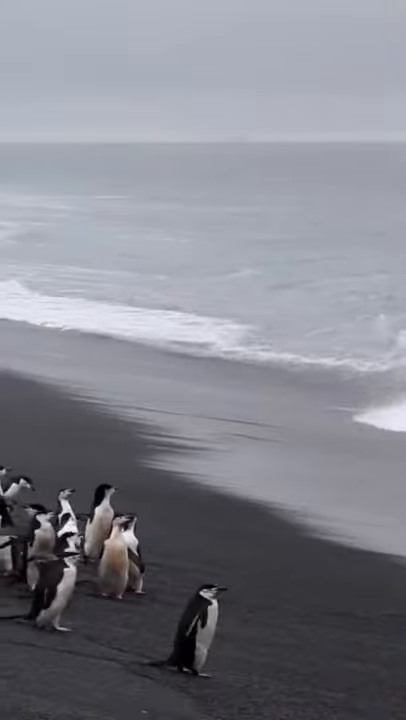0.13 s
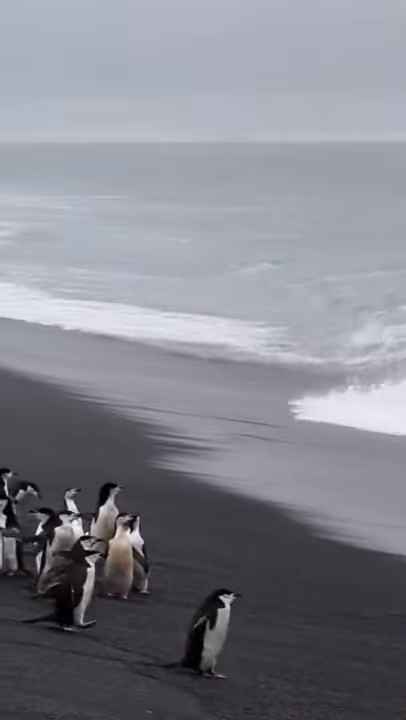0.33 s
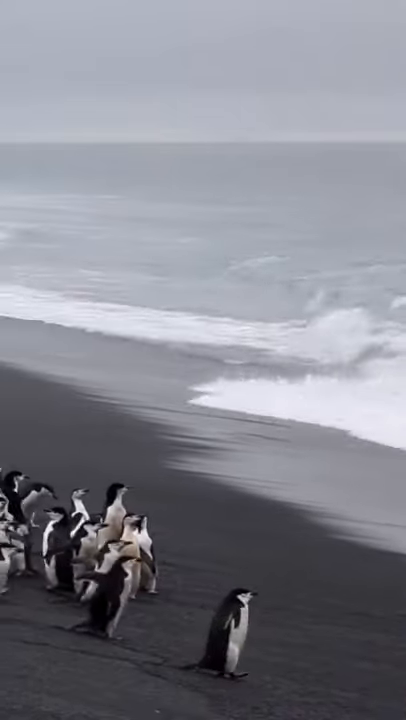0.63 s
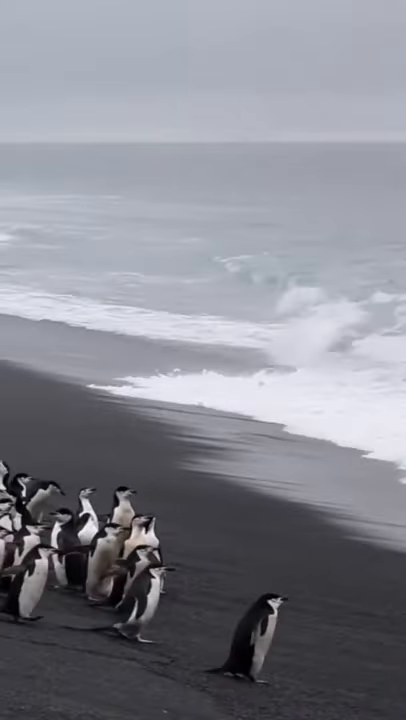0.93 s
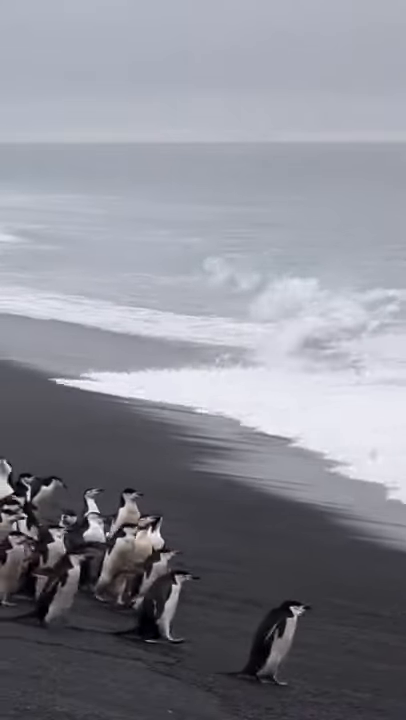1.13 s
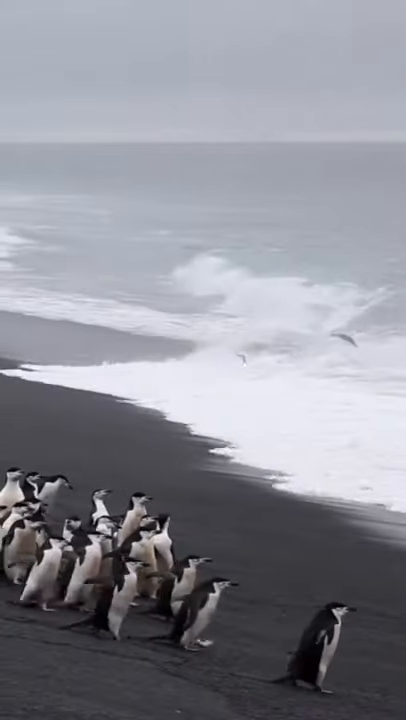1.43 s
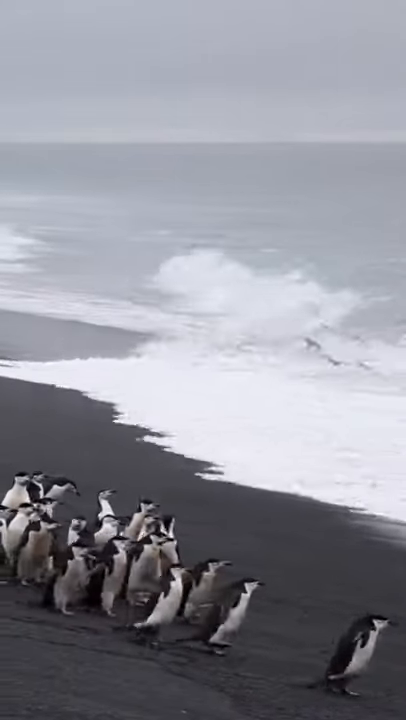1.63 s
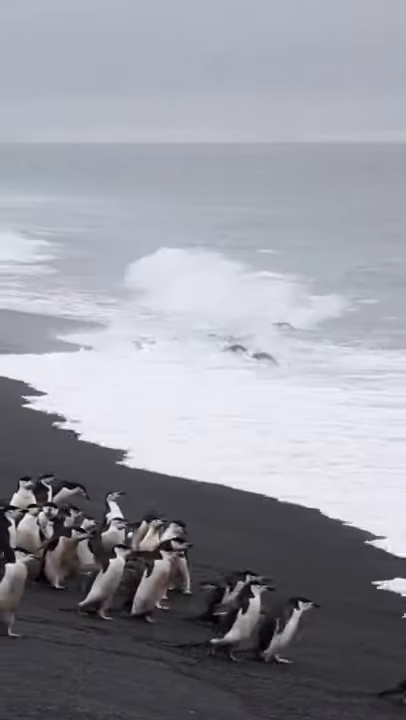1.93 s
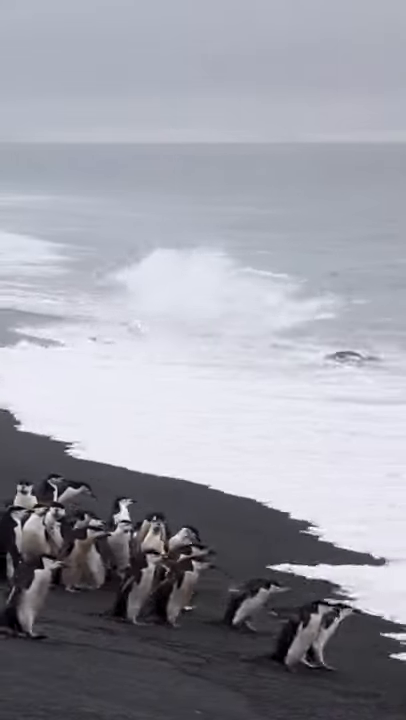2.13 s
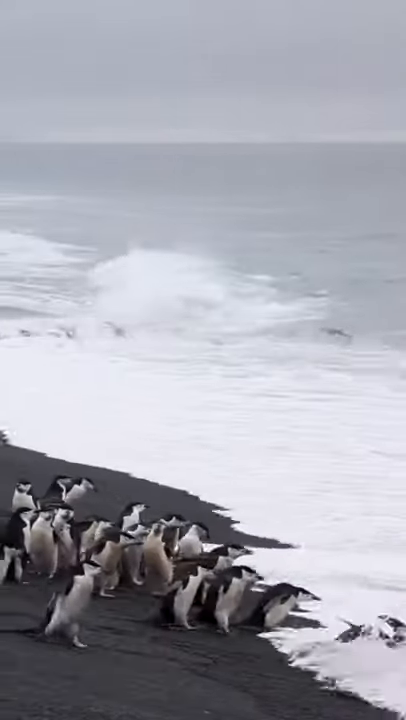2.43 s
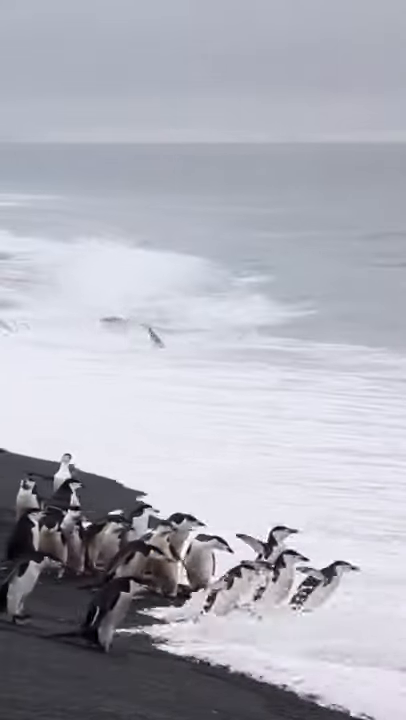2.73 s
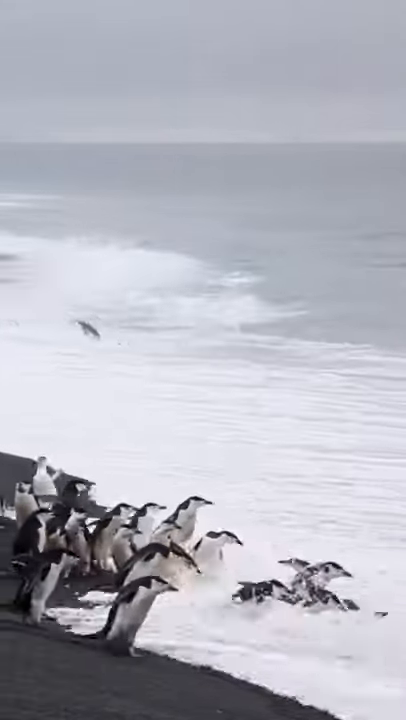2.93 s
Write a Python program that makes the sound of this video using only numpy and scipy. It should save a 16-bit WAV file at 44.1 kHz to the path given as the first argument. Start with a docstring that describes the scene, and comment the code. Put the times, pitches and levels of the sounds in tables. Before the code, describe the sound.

Surf runs up a dark gravelly beach, hissing and fizzing continuously; a breaker roars behind it and wind thuds hard on a phone microphone. A few faint bird peeps and rasps sound early on.

```python
"""Surf running up a gravel beach in gusty wind, taken on a phone microphone: the wash hisses and fizzes.
Behind it the breaker roars, with slaps and spray; both are noise shaped by level and spectrum curves.
Wind rumbles on the microphone and strong eddies bump it one by one, each a short swing of pressure.
Seabirds sit faintly in the roar: peeps are gliding sines, rasps are bursts of throaty noise.
All is central except the treble of the foam, which spreads to the sides."""
import sys
import numpy as np
from scipy import signal
from scipy.fft import rfft, irfft, next_fast_len
from scipy.io import wavfile
from scipy.ndimage import uniform_filter1d, map_coordinates

SR = 44100
rng = np.random.default_rng(int(sys.argv[2]) if len(sys.argv) > 2 else 0)


def volts_from_decibels(level):
    """Turn decibel levels (scalar or array-like) into linear amplitude factors."""
    exponent = np.asarray(level, float) / 20
    return 10 ** exponent


def to_wav(s):
    """Save 16-bit WAV."""
    ch = np.atleast_2d(s).T  # columns
    pcm = np.round(np.clip(ch, -1, 1) * 32767)  # PCM
    wavfile.write(sys.argv[1], SR, pcm.astype(np.int16))


N = 136269  # samples

# Foam running over the gravel: t/s, hiss level/dB, treble level/dB (only its departure from the mean counts)
WASH_LEVELS = [(0.15, -26.5, -11.5), (0.33, -26.5, -16), (0.35, -25.5, -15.5), (0.44, -27, -9),
               (0.51, -30.5, -11.5), (0.57, -27.5, -15), (0.59, -28.5, -17), (0.63, -23.5, -18),
               (0.74, -27.5, -11), (0.8, -23, -20.5), (0.84, -25.5, -12), (0.87, -21, -24),
               (0.88, -23, -16), (1.09, -27.5, -11.5), (1.34, -24, -12), (1.55, -24, -11), (1.7, -27, -8.5),
               (1.75, -23, -15), (1.81, -28.5, -6.5), (2.15, -24.5, -11), (2.32, -25, -7.5),
               (2.44, -26, -8.5), (2.58, -27.5, -5.5), (2.86, -29, -9.5), (2.88, -25.5, -10.5),
               (2.99, -31.5, -9), (3.07, -29.5, -6.5), (3.08, -29.5, -10.5)]
# Roar of the wave behind the wash: t/s, level/dB
BREAKER_LEVELS = [(.13, -36.5), (.45, -44.5), (.6, -34.5), (.75, -26), (.88, -24.5), (1.0, -28.5),
                  (1.15, -31.5), (1.4, -28.5), (1.55, -28), (1.76, -26), (1.95, -25), (2.12, -28),
                  (2.26, -22.5), (2.35, -22.5), (2.45, -26), (2.56, -23.5), (2.7, -29.5), (2.87, -39.5),
                  (3.08, -35)]
# Wind rumble at the microphone: t/s, level/dB
GUST_LEVELS = [(.13, -38), (.22, -28.5), (.3, -30), (.38, -28.5), (.43, -33.5), (.49, -24), (.56, -30.5),
               (.595, -35), (.9, -33), (1.0, -26), (1.1, -32), (1.22, -34.5), (1.29, -31.5), (1.39, -29.5),
               (1.5, -33.5), (1.64, -27.5), (1.8, -31), (1.97, -35), (2.03, -24.5), (2.2, -29),
               (2.5, -27.5), (2.7, -31), (2.8, -29), (2.9, -36.5), (2.96, -29.5), (3.03, -41), (3.08, -32)]
# Spectrum of the foam's hiss: f/Hz, density/dB
HISS_SPECTRUM = [(530, -50), (900, -5.5), (1480, -3.5), (1830, -1), (2090, -2.5), (3380, -3), (4040, -2),
                 (5040, -7.5), (5510, -4.5), (6650, -7.5), (10000, -30.5), (12800, -37.5), (16700, -67),
                 (22000, -120)]
# Spectrum of the breaker: f/Hz, density/dB
ROAR_SPECTRUM = [(60, -58), (200, -16), (400, 0.5), (800, -3), (1300, -9), (2500, -15.5), (6000, -66)]
# Spectrum of the wind rumble: f/Hz, density/dB
RUMBLE_SPECTRUM = [(10, -64), (30, -28), (60, -20), (100, -6.5), (200, 1), (400, -9), (900, -15),
                   (3000, -80)]
# Width of the foam: f/Hz, side over mid/dB
FOAM_WIDTH = [(3950, -95), (4150, -15.5), (4900, -2.5), (8000, -2.5), (13000, -4)]
# Strong eddies bumping the microphone: t/s, peak level/dB, pitch f/Hz, width/cycles
STRONG_EDDIES = [(0.168, -19, 162, 1.7), (0.236, -10.5, 216, 0.92), (0.261, -17, 170, 0.79),
                 (0.28, -21, 180, 0.92), (0.293, -16, 170, 0.72), (0.324, -19, 160, 0.93),
                 (0.344, -15, 192, 0.65), (0.373, -18.5, 190, 0.73), (0.471, -5, 378, 1.8),
                 (0.48, -4, 213, 0.26), (0.489, -14, 260, 0.31), (0.504, -4.5, 162, 0.32),
                 (0.555, -10.5, 170, 1.6), (0.79, -14, 544, 2.1), (0.976, -7, 177, 0.93),
                 (1.001, -17, 270, 1.2), (1.007, -11.5, 453, 2), (1.015, -13, 218, 1.7),
                 (1.027, -8, 497, 3.7), (1.034, -2.5, 228, 0.93), (1.54, -11.5, 161, 1.2),
                 (1.631, -7.5, 234, 1.3), (1.641, -8, 266, 1.3), (1.646, -4.5, 388, 0.8),
                 (1.7, -20, 253, 2.4), (1.752, -8.5, 880, 2.8), (2.025, -15, 145, 1.3),
                 (2.043, -13, 162, 0.52), (2.091, -19, 272, 0.45), (2.265, -13.5, 393, 1.5),
                 (2.281, -12, 398, 1.2), (2.381, -18.5, 285, 2.2), (2.47, -12.5, 240, 1),
                 (2.514, -7.5, 414, 1.54), (2.53, -22, 303, 0.98), (2.537, -13, 320, 0.79),
                 (2.622, -15, 338, 1.1), (2.655, -12, 238, 0.69), (2.745, -16.5, 270, 0.97),
                 (2.797, -16, 137, 1.3), (3.081, -6.5, 170, 0.79)]
# Bird peeps: start t/s, length/s, first f/Hz, last f/Hz, level/dB
BIRD_PEEPS = [(.25, .045, 2050, 2230, -33), (.352, .114, 2750, 1965, -27.5),
              (.298, .058, 3880, 3760, -29.5), (.332, .03, 1790, 1750, -28), (.346, .054, 5450, 5350, -30),
              (.35, .03, 4750, 4650, -33), (.4, .035, 4550, 4400, -33), (.532, .045, 5150, 4950, -34),
              (.662, .048, 2400, 1900, -30.5), (.625, .025, 3650, 3550, -29),
              (.645, .03, 5300, 5250, -34.5), (2.9, .028, 5350, 5100, -29.5)]
# Bird rasps: start t/s, length/s, level/dB
BIRD_RASPS = [(0.339, 0.071, -24.5), (0.401, 0.063, -28), (0.531, 0.054, -25.5), (.61, 0.064, -36),
              (2.885, 0.029, -39)]
# Spectrum of the rasping throat: f/Hz, density/dB
THROAT_SPECTRUM = [(1200, -36), (2200, 8), (3500, 7), (5200, 8), (6800, -6), (9500, -37), (13000, -63)]
# Slaps and spray of the wave: centre t/s, half length/s, centre f/Hz, peak level/dB
SPLASH_SWELLS = [(2.34, 0.033, 960, -22.5), (2.55, 0.053, 830, -30.5), (2.42, 0.28, 4200, -32),
                 (2.3, 0.034, 4600, -29), (2.25, 0.43, 11500, -54)]

FOAM_TREBLE_HZ = 4880  # treble above this swells as the foam comes near
FIZZ_DB, FIZZ_HZ, FIZZ_CYCLES = -12, 3650, 1.8  # level against the hiss, middle pitch, width
EDDY_DB, EDDY_HZ, EDDY_CYCLES = -3.5, 170, 0.94  # small eddies: level against the rumble, middle pitch, width
HEAVE_DB, HEAVE_RATIO = -9.5, 0.47  # slow heave: level and pitch against its strong eddy
FLUTTER_DB, FLUTTER_RATIO = -11, 1.85  # quick flutter: level and pitch against its strong eddy
GLIDE_S, PEEP_WAVER = .028, .008  # time constant of the glide; waver as a share of pitch
HOARSE_DB = 3.5  # level waver of a peep with no glide; scaled by last over first pitch
EDGE_S = .008  # fade at each end of a bird call
SPLASH_OCTAVES = 0.5  # spacing of the points that shape a splash band
LOW_CUT_HZ = 45
CLIP_LEVEL, CLIP_HARDNESS = .85, 4  # amplitude ceiling; exponent of the bend towards it
START_S = .129  # the microphone opens


def unit(x):
    """Scales to rms 1."""
    return x / np.sqrt(np.mean(x ** 2) + 1e-20)


def curves(rows):
    """Draws one value per sample for each column after the time."""
    s, *columns = np.transpose(rows)
    return [np.interp(np.arange(N) / SR, s, column) for column in columns]


def wobble(rate):
    """A smooth random curve, rate knots a second."""
    return map_coordinates(rng.standard_normal(1600), [np.arange(N) * rate / SR], mode="wrap")


def coloured(x, points):
    """Passes x through a spectrum of (Hz, dB) points, joined along log frequency."""
    size = next_fast_len(N + 8192)
    hz, db = np.transpose(points)
    log_hz = np.log(np.fft.rfftfreq(size, 1 / SR) + 1)
    gain = volts_from_decibels(np.interp(log_hz, np.log(hz + 1), db, -120, -120))
    return irfft(rfft(x, size) * gain, size)[..., :N]


def patchy(depth_db, channels):
    """White noise with patches of random gain in time and frequency, shared by its channels."""
    z = signal.stft(rng.standard_normal((channels, N)), nperseg=512)[2]
    field = uniform_filter1d(rng.standard_normal(z.shape[1:]), 6, axis=0)
    field = uniform_filter1d(field, 8, axis=1)
    return signal.istft(z * volts_from_decibels(depth_db * unit(field)), nperseg=512)[1][:, :N]


def wavelets(s, gain, hz, cycles, size):
    """Short swings of pressure centred on times s, each a few cycles under a bell."""
    k = np.arange(-size, size)
    turns = k / SR * np.asarray(hz)[:, None]
    phase = 2 * np.pi * rng.random((len(s), 1))
    bell = np.exp(-(2 * turns / cycles) ** 2)
    wave = np.asarray(gain)[:, None] * bell * np.cos(2 * np.pi * turns + phase)
    at = np.clip((np.asarray(s)[:, None] * SR).astype(int) + k, 0, N)
    return np.bincount(at.ravel(), wave.ravel(), N + 1)[:N]


def grains(hz, cycles, spread, size_db, count, size):
    """A random rain of wavelets, of scattered pitch and size."""
    s = rng.random(count) * N / SR
    gain = volts_from_decibels(size_db * np.minimum(rng.exponential(size=count), 2))
    pitch = hz * np.exp(spread * np.clip(rng.standard_normal(count), -2, 2))
    return unit(wavelets(s, gain, pitch, cycles, size))


def gate(s, length):
    """Opens at s and is shut again after length, with soft edges."""
    t = np.arange(N) / SR - s
    return np.clip(np.minimum(t, length - t) / EDGE_S, 0, 1)


def wash():
    """Hiss of foam with bursting bubbles; two unrelated streams, for centre and sides."""
    level_db, treble_db = curves(WASH_LEVELS)
    hiss = unit(coloured(patchy(depth_db=1.5, channels=2), HISS_SPECTRUM))
    fizz = [grains(FIZZ_HZ, FIZZ_CYCLES, spread=0.39, size_db=4.0, count=6000, size=48) for _ in range(2)]
    foam = hiss + volts_from_decibels(FIZZ_DB) * np.array(fizz)
    high_pass = signal.butter(4, FOAM_TREBLE_HZ, "high", fs=SR, output="sos")
    treble = signal.sosfiltfilt(high_pass, foam)
    level = volts_from_decibels(level_db + 1.0 * wobble(3.4) + 0.4 * wobble(9.83))
    treble_gain = volts_from_decibels(treble_db - treble_db.mean() + 0.79 * wobble(17))
    return level * (foam + (treble_gain - 1) * treble)


def breaker():
    """The dull tumbling roar of the wave: low noise of unsteady level."""
    level_db, = curves(BREAKER_LEVELS)
    roar = unit(coloured(patchy(depth_db=0.83, channels=1)[0], ROAR_SPECTRUM))
    return volts_from_decibels(level_db + 0.28 * wobble(8.8) + 0.98 * wobble(44.95)) * roar


def wind():
    """Lumpy rumble and a stream of small eddies, rising and falling with the gusts."""
    level_db, = curves(GUST_LEVELS)
    rumble = unit(volts_from_decibels(3.3 * wobble(24.88)) * coloured(rng.standard_normal(N), RUMBLE_SPECTRUM))
    eddies = grains(EDDY_HZ, EDDY_CYCLES, spread=0.57, size_db=0, count=400, size=900)
    return volts_from_decibels(level_db) * (rumble + volts_from_decibels(EDDY_DB) * eddies)


def strong_eddies():
    """Eddies bump the microphone; each rides on a slower heave of pressure and carries a quicker flutter."""
    s, db, hz, cycles = np.transpose(STRONG_EDDIES)
    bump = wavelets(s, volts_from_decibels(db), hz, cycles[:, None], size=900)
    heave = wavelets(s, volts_from_decibels(db + HEAVE_DB), HEAVE_RATIO * hz, 0.98, size=1500)
    flutter = wavelets(s, volts_from_decibels(db + FLUTTER_DB), FLUTTER_RATIO * hz, 0.8, size=300)
    return bump + heave + flutter


def peeps():
    """Seabird peeps: wavering, slightly hoarse tones that glide towards their last pitch."""
    t, out = np.arange(N) / SR, np.zeros(N)
    for s, length, first_hz, last_hz, db in BIRD_PEEPS:
        hz = last_hz + (first_hz - last_hz) * np.exp(-np.maximum(t - s, 0) / GLIDE_S)
        hz = hz * (1 + PEEP_WAVER * wobble(90))
        hoarse_db = HOARSE_DB * last_hz / first_hz
        level = volts_from_decibels(db + 0.5 * wobble(50) + hoarse_db * wobble(500))
        out += level * gate(s, length) * np.sin(2 * np.pi * np.cumsum(hz) / SR)
    return out


def rasps():
    """Seabird rasps: short bursts of noise coloured by the throat."""
    noise = unit(coloured(patchy(depth_db=2.5, channels=1)[0], THROAT_SPECTRUM))
    return noise * sum(volts_from_decibels(db) * gate(s, length) for s, length, db in BIRD_RASPS)


def splashes():
    """Parts of the wave slap down or throw spray: swells of noise round one pitch."""
    t, out = np.arange(N) / SR, np.zeros(N)
    for s, half, hz, db in SPLASH_SWELLS:
        band = [(hz * 2 ** (k * SPLASH_OCTAVES), -6 * k * k) for k in range(-3, 4)]
        swell = np.exp(-((t - s) / half) ** 2)
        out += volts_from_decibels(db) * swell * unit(coloured(rng.standard_normal(N), band))
    return out


def scene():
    """Puts everything in the centre and spreads the treble of the foam to left and right."""
    centre, sides = wash()
    mid = centre + breaker() + wind() + strong_eddies() + peeps() + rasps() + splashes()
    side = coloured(sides, FOAM_WIDTH)
    return np.array([mid + side, mid - side])


def low_pass(x):
    """Removes everything above the highest recorded frequency."""
    return signal.sosfilt(signal.butter(12, 12970, fs=SR, output="sos"), x)


def record(dry):
    """The phone microphone loses the deep bass, rounds off the highest peaks and opens abruptly."""
    low_cut = signal.butter(2, LOW_CUT_HZ, "high", fs=SR, output="sos")
    heard = signal.sosfilt(low_cut, dry)
    rounded = heard / (1 + np.abs(heard / CLIP_LEVEL) ** CLIP_HARDNESS) ** (1 / CLIP_HARDNESS)
    is_open = np.arange(N) >= START_S * SR
    return low_pass(rounded * is_open)


dry = scene()
out = record(dry)
to_wav(out)
```